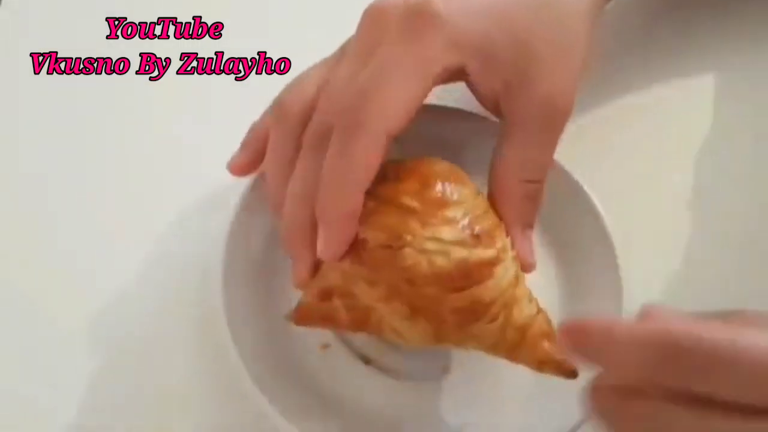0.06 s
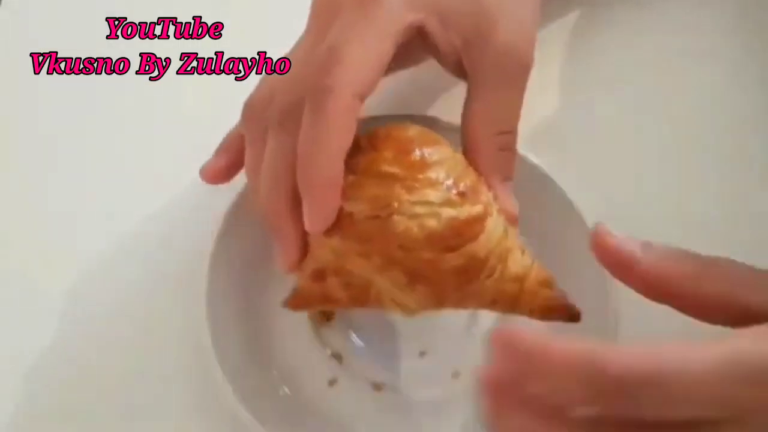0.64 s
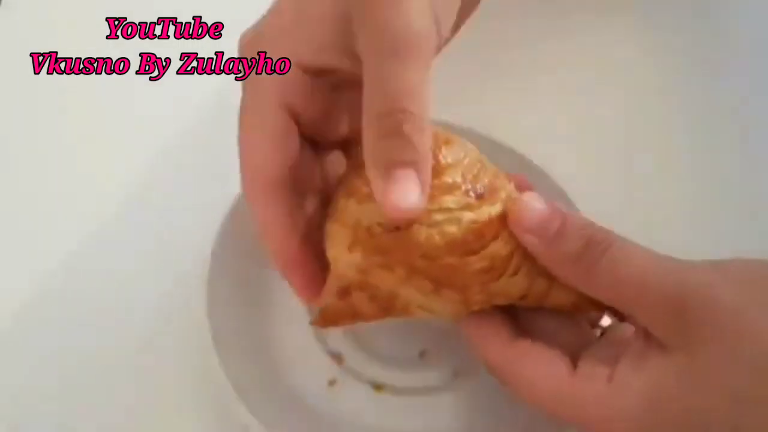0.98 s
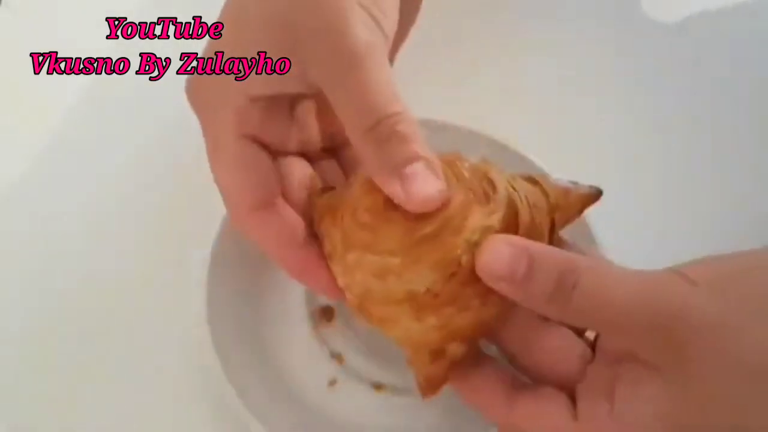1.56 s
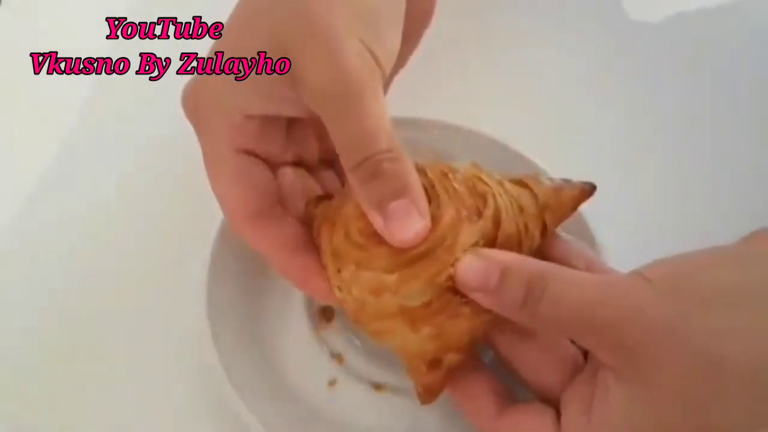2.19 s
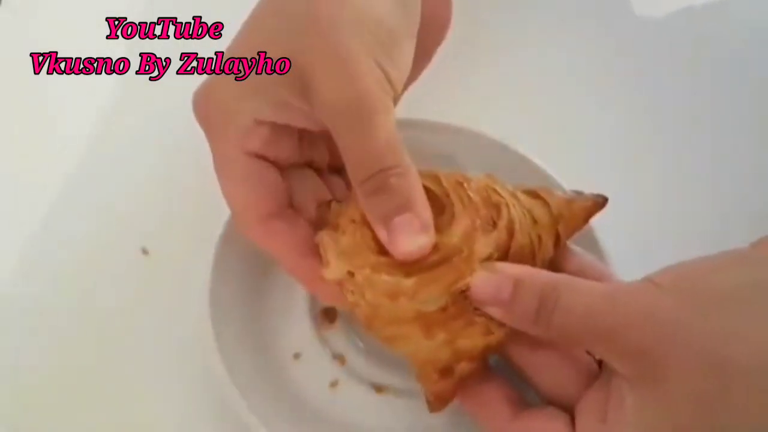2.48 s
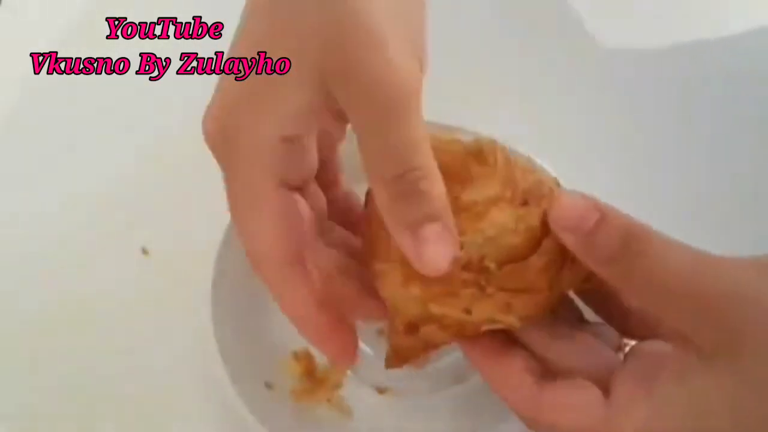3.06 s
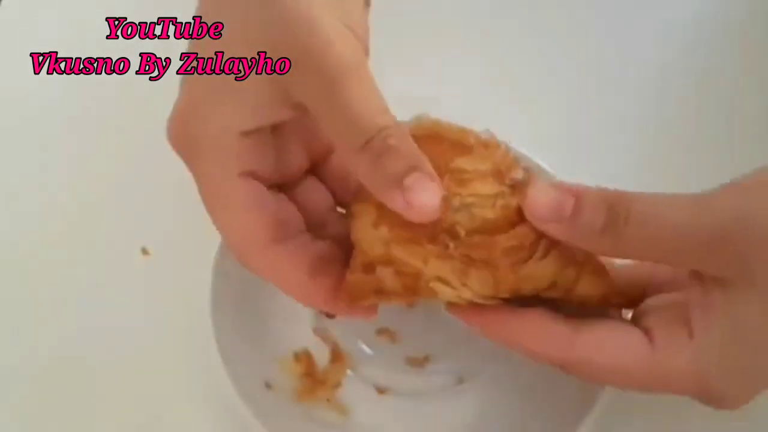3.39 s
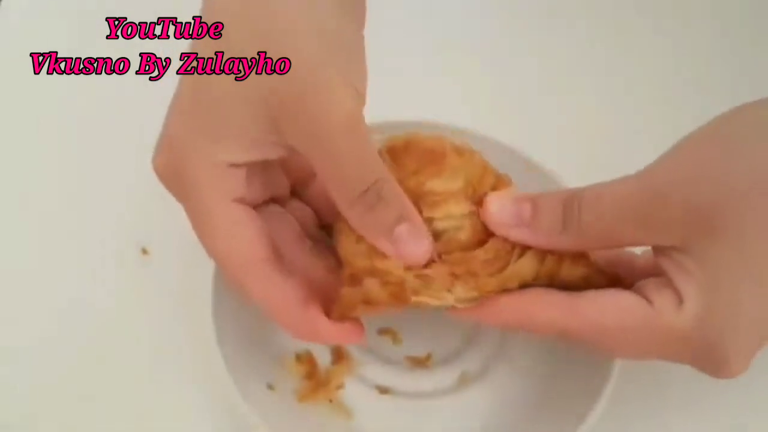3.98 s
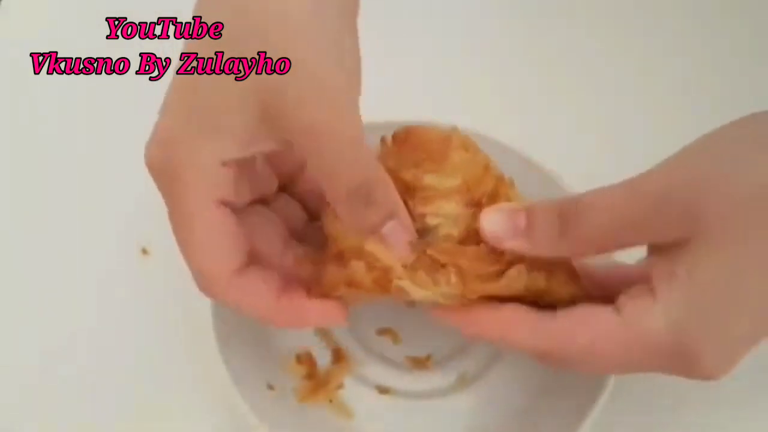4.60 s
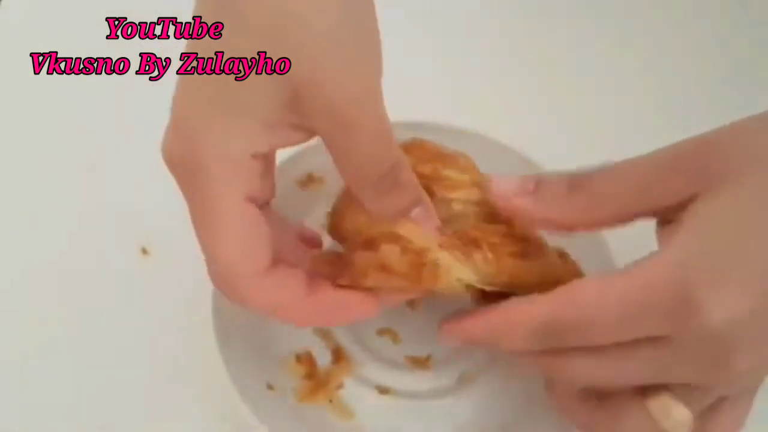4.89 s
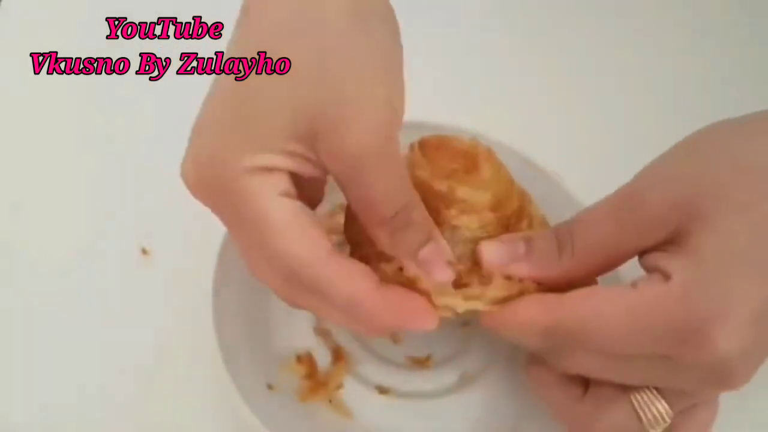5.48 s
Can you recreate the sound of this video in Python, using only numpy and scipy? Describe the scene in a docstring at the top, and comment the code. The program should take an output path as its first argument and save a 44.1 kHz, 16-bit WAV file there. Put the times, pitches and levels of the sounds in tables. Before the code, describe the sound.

A plate scrapes and clinks on a table, then crisp puff pastry is broken apart by hand in three close, crackling bouts.

```python
"""A small quiet room, at a table: a baked puff pastry is lifted from a china plate and torn open by hand.
The plate is nudged over the table top with bumps and scrapes, and clinks as fingers and ring catch it.
Up close, the crust gives way in three bouts: a crackle of tiny flake fractures, with louder snaps of
whole layers on top and the dull tearing of soft dough beneath. Dry skin rubs as the grip changes.
A low room tone and a short tail off the walls sit behind it all."""
import sys
import numpy as np
from scipy import signal
from scipy.fft import rfft, irfft, next_fast_len
from scipy.io import wavfile
from scipy.ndimage import uniform_filter1d, map_coordinates

SR = 44100
rng = np.random.default_rng(int(sys.argv[2]) if len(sys.argv) > 2 else 0)


def to_wav(s):
    """Save 16-bit WAV."""
    ch = np.atleast_2d(s).T  # columns
    pcm = np.round(np.clip(ch, -1, 1) * 32767)  # PCM
    wavfile.write(sys.argv[1], SR, pcm.astype(np.int16))


N = 244314

# stereo image: (frequency [Hz], left-right correlation [0..1])
STEREO_LIKENESS = [(30, 0.4), (150, 0.93), (400, 0.47), (1000, 0.02), (2000, 0.14), (4000, 0.012),
                   (12000, 0.016)]
# colour mismatch of the microphones: (frequency [Hz], left minus right [dB])
MIC_TILT = [(100, 0.5), (350, 2), (750, -4.5), (1250, 1), (2100, -2), (4000, 0.2), (8000, -0.5), (12500, 2)]
# room tone: (frequency [Hz], relative level [dB])
ROOM_TONE_EQ = [(20, -21.5), (70, -10.5), (110, -9), (150, -3), (200, -12), (280, -18), (500, -21.5),
                (1000, -24), (1500, -27), (3000, -29.5), (6000, -34.5), (9000, -38), (15000, -37)]
# tail off the walls: (frequency [Hz], t60 [s])
ROOM_DECAY = [(200, 0.067), (2000, 0.16), (12000, 0.015)]
# resonances of the table top: (frequency [Hz], relative level [dB], t60 [s])
TABLE_MODES = [(164.6, -9.5, 0.21), (237, -0.5, 0.12), (310, 9.5, 0.027), (381, 8, 0.028),
               (453.8, -2.5, 0.11), (560, -31, 0.014), (1038, -11, 0.065), (1870, -24, 0.18)]
# the plate's foot bumps the table: (time [s], peak [dB], favoured pitch [Hz])
BUMPS = [(0.0239, -24.5, 340), (.28, -21.5, 337), (.288, -27.5, 430), (.338, -30, 395), (.345, -26.5, 305),
         (.353, -29.5, 330), (.382, -36, 300), (0.539, -47, 450), (0.645, -40, 400), (0.665, -40, 290),
         (0.679, -42.5, 230), (0.712, -55, 280), (2.005, -43.5, 267), (2.683, -36, 337),
         (2.8544, -28.5, 233), (2.868, -31, 235), (2.879, -33.5, 444), (3.57, -48, 400)]
# the plate slides: (start [s], length [s], level [dB])
SHOVES = [(0, 0.056, -43.5), (.28, 0.054, -43), (.35, 0.061, -49.5), (.455, 0.068, -59), (.515, 0.04, -52),
          (.555, 0.072, -54), (.636, 0.053, -59), (2.64, 0.16, -59), (2.778, 0.051, -47), (2.87, 0.11, -68),
          (2.988, 0.025, -57.5), (3.5, 0.052, -63.5), (3.56, 0.03, -57), (4.655, 0.039, -60)]
# china scraping on wood: (frequency [Hz], relative level [dB])
SCRAPE_EQ = [(40, -30), (120, -28), (230, 0.5), (340, -6.5), (410, 1), (460, 9), (520, -7.5), (620, -8),
             (780, -18.5), (1600, -18), (3000, -29.5), (6000, -48.5), (15000, -51.5)]
# resonances of the plate: (frequency [Hz], relative level [dB], t60 [s])
CHINA_MODES = [(1106, -7.5, 0.019), (1417, -13, 0.034), (1642, -8, 0.043), (1905, -16, 0.23),
               (2045, 4, 0.016), (2120, -11.5, 0.024), (2747, -15, 0.076), (3510, -15, 0.089),
               (3860, 0.5, 0.13), (4279, 6, 0.034), (4368, 2.5, 0.039), (4570, -23, .025),
               (4960, -8, 0.035), (6395, -3.5, 0.071), (7120, -3.5, 0.048), (7400, -10.5, 0.023),
               (9870, -15, 0.08), (10400, -15, 0.032), (14100, -22.5, 0.037)]
# taps on the plate: (time [s], peak [dB], favoured mode [Hz], hardness [treble tilt, higher is brighter],
# low ring of the bowl [dB], finger damping [dB/s], peak of the thud through the table [dB])
TAPS = [(0.394, -41, 1370, -4, -4, 896, -60), (0.399, -38.5, 1380, -6, -5.5, 700, -60),
        (1.051, -17, 4100, 1.5, -1, 220, -32), (1.055, -21.5, 6300, 2.5, -1.5, 350, -47.5),
        (1.066, -32, 6350, 3.5, 4, 400, -41.5), (2.663, -31.5, 3900, 0, -8, 500, -43.5),
        (2.701, -24.5, 4270, 2, 0, 600, -38.5), (2.716, -29.5, 4070, -3, -3, 500, -35.5),
        (2.818, -19.5, 4180, 2, 3.5, 1400, -37), (2.8225, -26.5, 2030, 5.5, 0, 899, -42),
        (2.9078, -11.5, 4280, 4, 4.5, 1500, -33), (2.921, -29, 4250, 9, -11, 900, -46),
        (3.114, -35.5, 6200, 11, 2, 200, -55), (3.214, -39, 3630, 6.5, -4, 30, -61),
        (4.401, -27.5, 4430, 0.5, 0, 902, -46), (4.406, -34, 4350, 0, 7, 900, -49),
        (4.625, -33.5, 3840, 2, 3, 48, -47.5), (4.649, -39, 1580, -5, -3, 502.5, -48.5)]
# contact click of a tap: (frequency [Hz], relative level [dB])
CLICK_EQ = [(200, -3), (500, -6), (2000, -7.5), (4500, -4.5), (7500, -47), (8700, -56), (10000, -36),
            (15000, -32)]
# skin slides over table and crust: (start [s], length [s], level [dB])
RUBS = [(.24, 0.031, -61), (.33, 0.026, -61), (.51, 0.084, -70), (.775, 0.018, -62), (1.3, 0.026, -63),
        (3.41, 0.052, -61.5), (3.47, 0.086, -60)]
# dry skin friction: (frequency [Hz], relative level [dB])
SKIN_EQ = [(150, -10), (500, -5), (760, -3), (960, -1.5), (1200, -8.5), (2000, -7.5), (3000, -9),
           (4500, -16), (8000, -21.5), (15000, -26)]
# fingertips shift on the crust: (start [s], length [s], level [dB])
TOUCHES = [(.96, 0.022, -67), (1.303, 0.042, -61.5), (1.503, 0.0089, -58), (3.368, 0.01, -60),
           (3.727, 0.013, -58), (3.785, .008, -59), (3.81, 0.0097, -58.5)]
# the inner dough gives way: (start [s], length [s], level [dB], pocket pitch [Hz])
PULLS = [(4.01, 0.014, -50, 1000), (4.039, 0.021, -50.5, 850), (4.08, 0.0087, -40, 950),
         (4.097, 0.014, -53, 358), (4.283, 0.019, -53, 900), (4.31, 0.014, -53, 370),
         (4.487, 0.017, -54, 1300)]
# dull tearing of dough: (frequency [Hz], relative level [dB])
DOUGH_EQ = [(120, -46), (380, 4), (580, -7), (850, -5), (1150, -2.5), (1600, -10), (2500, -12), (6000, -17),
            (15000, -41)]
# brittle crust breaking: (frequency [Hz], relative level [dB])
CRUST_EQ = [(120, -10.5), (240, -15.5), (400, -9.5), (700, -17.5), (1150, -4), (1500, -7), (2020, -2.5),
            (2600, -1.5), (4180, 1.5), (7220, 1), (8200, -3), (9000, -15), (10500, -12.5), (12500, -12.5),
            (15000, -13.5)]
# crackle bed under the thumbs' pressure, one envelope per bout: (time [s], level [dB])
SQUEEZES = [
    [(1.62, -67), (1.665, -64), (1.712, -51), (1.8, -55.5), (1.856, -52.5), (2.12, -59.5), (2.147, -70),
     (2.2, -40), (2.245, -43.5), (2.277, -57.5), (2.31, -46), (2.47, -45), (2.55, -51), (2.636, -43),
     (2.78, -52.5), (2.93, -64.5), (3.0, -58.5), (3.06, -91)],
    [(3.7, -77), (3.8, -72), (3.86, -60), (3.925, -60.5), (3.99, -50.5), (4.1, -50), (4.128, -61),
     (4.16, -46), (4.215, -56), (4.27, -46.5), (4.32, -41), (4.358, -60), (4.39, -57.5), (4.43, -49.5),
     (4.526, -46.5), (4.656, -58), (4.73, -70.5)],
    [(4.98, -73), (5.058, -67.5), (5.19, -66.5), (5.29, -66), (5.34, -57), (5.482, -57), (5.54, -51)],
]
# a patch of crust caves in: (start [s], length [s], level [dB], hollow band gain [dB])
CRUNCHES = [(1.771, 0.027, -47.5, 1), (1.868, 0.028, -51.5, 2), (1.962, 0.014, -50, -2),
            (2.042, .012, -47.5, 9), (2.087, 0.015, -44, 1), (2.121, 0.0052, -45, -12),
            (2.195, 0.019, -44, 13), (2.366, 0.062, -39.5, -11), (2.494, 0.011, -42, 8),
            (2.584, 0.046, -48, -15), (2.733, 0.017, -46.5, 4), (3.838, 0.0074, -53, 4),
            (3.852, 0.024, -52.5, 2), (3.999, 0.055, -46, -1.5), (4.07, 0.037, -47.5, 2),
            (4.226, 0.0055, -51.5, -8), (4.288, 0.024, -52, 8), (4.484, 0.026, -40.5, 1),
            (5.338, 0.023, -52.5, -10), (5.405, 0.011, -43, -6), (5.468, 0.027, -48.5, -10)]
# a whole layer snaps: (time [s], level over 2 ms [dB], layer pitch [Hz])
SNAPS = [(1.679, -42, 1900), (1.704, -40.5, 2200), (1.7128, -48, 6180), (1.7671, -31.5, 7160),
         (1.8059, -39.0, 6900), (1.8292, -49, 4770), (1.8623, -38, 7000), (1.916, -39.5, 6410),
         (1.9398, -31.5, 6360), (2.0009, -35.5, 4800), (2.0324, -37, 4440), (2.0567, -38, 2370),
         (2.068, -35.5, 6900), (2.089, -30, 6410), (2.1082, -30.0, 6180), (2.159, -31.5, 7200),
         (2.183, -31.5, 4280), (2.1955, -32.0, 2120), (2.2095, -26.5, 6900), (2.2185, -24.5, 5740),
         (2.2927, -37, 6900), (2.344, -33.0, 6650), (2.3721, -32.5, 6410), (2.4391, -30.5, 5330),
         (2.4667, -34.0, 4280), (2.4842, -33.0, 4280), (2.5023, -22.0, 2030), (2.5536, -33, 3970),
         (2.5757, -30.0, 6410), (2.5789, -30, 4280), (2.6319, -33.5, 5740), (2.7388, -38.5, 1910),
         (3.274, -52, 7160), (3.2983, -50, 4720), (3.7558, -51.5, 5960), (3.8111, -54.0, 3970),
         (3.8646, -42, 3970), (3.906, -50, 8000), (3.9408, -47, 5960), (4.1398, -34.5, 4800),
         (4.1922, -44, 2960), (4.23, -42, 4770), (4.2853, -28, 6700), (4.3723, -44, 5740),
         (4.4583, -33, 5330), (4.4719, -36, 6850), (4.5284, -31.5, 5530), (4.552, -39.0, 5140),
         (4.6062, -42, 4800), (4.6823, -48.0, 4770), (5.021, -48.5, 5740), (5.077, -49, 6410),
         (5.131, -45.5, 4770), (5.202, -50, 7710), (5.2144, -49, 4770), (5.2398, -53, 7430),
         (5.2831, -59, 5530), (5.3081, -45, 3070), (5.38, -40.5, 4950), (5.4057, -43, 5330),
         (5.4568, -41, 4280), (5.4801, -38.0, 6700), (5.5213, -31.5, 7710)]

TOP_HZ = 15150  # band limit
CRACK_RISE_S, CRACK_RUN_S = 0.0005, 0.0011  # attack and decay of a snap


def amp(db):
    """Decibels to gain."""
    return np.exp(np.asarray(db) * (np.log(10) / 20))


def unit(x):
    """Scale to rms 1."""
    return x / np.sqrt(np.mean(x ** 2) + 1e-20)


def to_peak(x, db):
    """Scale to a peak level."""
    return amp(db) * x / np.abs(x).max()


def along(points, hz):
    """Read (frequency, value) points on a log axis."""
    f, v = np.transpose(points)
    return np.interp(np.log(hz + 1), np.log(f + 1), v)


def bell(hz, centre_hz, octaves):
    """An EQ bell of height 1."""
    return np.exp(-(np.log2((hz + 1) / centre_hz) / octaves) ** 2)


def filtered(x, response):
    """Apply a gain curve over frequency."""
    n = x.shape[-1]
    m = next_fast_len(n + 2048)
    return irfft(rfft(x, m) * response(np.fft.rfftfreq(m, 1 / SR)), m)[..., :n]


def spread(pair, eq):
    """Colour two unrelated signals and blend to stereo at rms 1: narrow bass, wide treble."""
    angle = lambda hz: np.arccos(np.clip(along(STEREO_LIKENESS, hz), -1, 1)) / 2
    mid, side = filtered(pair, lambda hz: amp(along(eq, hz)) * [np.cos(angle(hz)), np.sin(angle(hz))])
    return unit(np.array([mid + side, mid - side]))


def wobble(rate_hz, n=N):
    """A smooth random curve of n samples."""
    knots = rng.standard_normal(int(n * rate_hz / SR) + 4)
    return map_coordinates(knots, [np.arange(n) * rate_hz / SR])


def add(track, s, sound):
    """Mix a stereo sound into the track at time s."""
    i = max(round(s * SR), 0)
    track[:, i:i + sound.shape[1]] += sound[:, :max(N - i, 0)]


def burst(t, rise_s, decay_s):
    """A stereo noise transient."""
    return rng.standard_normal((2, len(t))) * (1 - np.exp(-(t / rise_s) ** 2)) * np.exp(-t / decay_s)


def strokes(rows, attack_s, release_s, sag_db_per_s=0):
    """Gain envelope of gestures that rise, hold or sag, and die away."""
    t, gain = np.arange(N) / SR, np.zeros(N)
    for start, length, db in rows:
        first = max(int(start * SR), 0)
        age = np.maximum(t[first:first + SR // 3] - start, 0)
        shape = (1 - np.exp(-age / attack_s)) * np.exp(-np.maximum(age - length, 0) / release_s)
        gain[first:first + len(age)] += amp(db - sag_db_per_s * age) * shape
    return gain


def swarm(eq, per_s, scatter_db, clump_db, decay_s, voices=3):
    """A granular texture: tiny noise grains at random times and sizes, swelling in clumps."""
    t = np.arange(SR // 200) / SR
    pair = np.zeros((2, N))
    for _ in range(voices):
        onsets = (np.cumsum(rng.exponential(size=N // 20)) * SR * voices / per_s).astype(int)
        sizes = amp(scatter_db * np.minimum(rng.standard_normal(len(onsets)), 2))
        impulses = np.bincount(onsets[onsets < N], sizes[onsets < N], N)
        pair += signal.oaconvolve(impulses[None], burst(t, decay_s / 2, decay_s), axes=1)[:, :N]
    return spread(pair * amp(clump_db * np.tanh(wobble(120))), eq)


def ring(modes, t, apart_rad, scatter_db, detune):
    """Decaying modes, shifted by grip and place on each blow; high ones reach the two sides out of step."""
    hz, db, t60 = np.transpose(modes)[..., None]
    strength, phase, shift = rng.standard_normal((3, len(modes), 1))
    lead = np.minimum(hz / 4000, 1) * (2 * phase + apart_rad / 2 * np.array([1, -1])[:, None, None])
    cycles = hz * (1 + detune * shift) * t
    envelopes = amp(db + scatter_db * strength - 60 * t / t60)
    return np.sum(envelopes * np.sin(2 * np.pi * cycles + lead), axis=1)


def room_tone():
    """A faint, steady bed of low rumble."""
    return amp(-64) * spread(rng.standard_normal((2, N)), ROOM_TONE_EQ)


def room_tail(send):
    """Nearby walls answer with a short diffuse tail."""
    noise = spread(rng.standard_normal((2, SR // 3)), [(200, 0), (12000, 0.014)])
    hz, t, bands = signal.stft(noise, SR, nperseg=256)
    tail = signal.istft(bands * amp(-60 * t / along(ROOM_DECAY, hz)[:, None]), SR, nperseg=256)[1]
    tail = np.pad(tail / np.linalg.norm(tail[0]), ((0, 0), (SR // 200, 0)))  # 5 ms pre-delay
    return signal.fftconvolve(send, tail, axes=1)[:, :N]


def table_top():
    """The plate's foot bumps, sticks and slips on the wood; taps knock through it more brightly."""
    out, t = np.zeros((2, N)), np.arange(SR // 7) / SR
    bumps = [(s, db, hz, 6.5) for s, db, hz in BUMPS]
    knocks = [(s, thud_db, 400, 9) for s, *_, thud_db in TAPS]
    for s, db, pitch_hz, boost_db in bumps + knocks:
        thud = ring(TABLE_MODES, t, apart_rad=0.25, scatter_db=2, detune=0.043)
        thud *= 1 - np.exp(-t / 0.00097)
        grit = amp(-21) * spread(burst(t, 0.00023, 0.0084), SCRAPE_EQ)
        blow = filtered(thud + grit, lambda hz: amp(boost_db * bell(hz, pitch_hz, 0.4)))
        add(out, s, to_peak(blow, db))
    scrape = unit(spread(rng.standard_normal((2, N)), SCRAPE_EQ) * amp(2.83 * wobble(70)))
    sliding = strokes(SHOVES, attack_s=0.0017, release_s=0.025, sag_db_per_s=39)  # friction slows it
    low_cut = signal.butter(3, 135, 'high', fs=SR, output='sos')  # the knocks carry little deep bass
    return signal.sosfilt(low_cut, out + sliding * scrape)


def plate_clinks():
    """Taps ring the finger-damped china; the spot struck favours some modes, hardness the high ones."""
    out, t = np.zeros((2, N)), np.arange(SR // 6) / SR
    attack = 1 - np.exp(-(t / 0.0014) ** 2)
    for s, db, mode_hz, hardness, bowl_db, damping_db_per_s, _ in TAPS:
        modes = ring(CHINA_MODES, t, apart_rad=-2, scatter_db=1.2, detune=0.0067)
        chatter = amp(5 * np.tanh(wobble(450, len(t))))  # the plate rattles on its foot
        tone = modes * amp(-damping_db_per_s * t) * chatter * attack
        click = amp(-23) * spread(burst(t, 0.00042, 0.0055), CLICK_EQ)
        tilt = [(2600, 6.5 - 1.14 * hardness), (3500, 0.0007), (4800, 0),
                (6000, 0.61 * hardness), (11000, 2.1 * hardness)]
        eq = lambda hz: amp(along(tilt, hz) + 11 * bell(hz, mode_hz, 0.11)
                            + bowl_db * bell(hz, 2000, 0.25))
        add(out, s, to_peak(filtered(tone + click, eq), db))
    low_cut = signal.butter(2, 250, 'high', fs=SR, output='sos')  # the clinks carry no deep bass
    return signal.sosfilt(low_cut, out)


def skin_rubs():
    """Dry skin slides in countless soft slips as the hands change their grip."""
    slips = swarm(SKIN_EQ, per_s=2800, scatter_db=-0.5, clump_db=1, decay_s=0.0013)
    return strokes(RUBS, attack_s=0.0061, release_s=0.022) * slips


def dough_tears():
    """The soft inside tears dully; each pull opens a pocket with its own pitch."""
    fibres = swarm(DOUGH_EQ, per_s=900, scatter_db=3, clump_db=2, decay_s=0.00095)
    out = np.zeros((2, N))
    for s, length, db, pitch_hz in PULLS:
        pocket = unit(filtered(fibres, lambda hz: amp(13 * bell(hz, pitch_hz, 0.7))))
        out += strokes([(s, length, db)], attack_s=0.0035, release_s=0.0043) * pocket
    return out


def crust_chips(per_s=220, centre_hz=4610, spread_octaves=0.655, decay_cycles=4):
    """Stiff chips break off, each pinging for a few cycles at its own pitch."""
    out, t = np.zeros((2, N)), np.arange(SR // 70) / SR
    count = int(per_s * N / SR)
    times = rng.uniform(0, N / SR, count)
    traits = np.clip(rng.standard_normal((count, 4)), -2, 2)
    for s, (pitch, size, left, right) in zip(times, traits):
        cycles = centre_hz * 2 ** (spread_octaves * pitch) * t
        phase = np.pi * np.array([[left], [right]])
        envelope = amp(1.7 * size) * (np.exp(-cycles / decay_cycles) - np.exp(-cycles))
        add(out, s, envelope * np.sin(2 * np.pi * cycles + phase))
    return unit(out)


def crust_hollows(pair, depth_db):
    """Every patch of crust has its own hollows, so the colour keeps shifting."""
    bands = signal.stft(pair, nperseg=256)[2]
    colour = uniform_filter1d(rng.standard_normal(bands.shape[1:]), size=5, axis=0)
    colour = uniform_filter1d(colour, size=9, axis=1)
    return signal.istft(bands * amp(depth_db * unit(colour)), nperseg=256)[1][:, :N]


def breaking(crunches):
    """Envelope of the crackle: steady pressure, patches caving in, crumbs in the wake of each snap."""
    t = np.arange(N) / SR
    steady = sum(amp(np.interp(t, *np.transpose(bout), left=-120, right=-120)) for bout in SQUEEZES)
    caving = strokes(crunches, attack_s=0.00067, release_s=0.011)
    crumbs = strokes([(s, 0, db - 12.5) for s, db, _ in SNAPS], attack_s=CRACK_RUN_S, release_s=0.0086)
    return np.sqrt(steady ** 2 + caving ** 2 + crumbs ** 2)


def crust_crackle(firm_db=-50, crossover_hz=8700, hollow_hz=1780):
    """Pressure crushes the crust: thick flakes crackle over hollow pockets, a dust of thin ones fizzes."""
    flakes = swarm(CRUST_EQ, per_s=2200, scatter_db=-1, clump_db=2, decay_s=0.00047)
    flakes = crust_hollows(flakes, depth_db=3.5)
    stray_snaps = swarm(CRUST_EQ, per_s=110, scatter_db=0.5, clump_db=0, decay_s=0.00093)
    flakes = flakes + amp(-9.5) * stray_snaps + amp(-7) * crust_chips()
    dust = swarm(CRUST_EQ, per_s=3400, scatter_db=-0.5, clump_db=2.5, decay_s=0.00079)
    lows = lambda hz: 1 / (1 + (hz / crossover_hz) ** 10)
    thick = unit(filtered(flakes, lows))
    thin = unit(filtered(flakes + amp(0.5) * dust, lambda hz: 1 - lows(hz)))
    pockets = filtered(thick, lambda hz: bell(hz, hollow_hz, 0.51))
    avalanches = amp(1.3 * wobble(330) - firm_db)  # scaled so that a firm squeeze has force near 1
    force = avalanches * breaking([(s, length, db) for s, length, db, _ in CRUNCHES])
    hollow_force = avalanches * breaking([(s, length, db + lift) for s, length, db, lift in CRUNCHES])
    crackle = amp(firm_db - 0.5) * (force * (thick - pockets) + hollow_force * pockets)
    fizz = amp(firm_db + 0.5) * force ** 1.09 * thin  # a harder squeeze is brighter
    fingertips = strokes(TOUCHES, attack_s=0.0097, release_s=0.0044) * (thick + amp(-5) * thin)
    return crackle + fizz + fingertips


def layer_snaps(lead_in_s=0.0023, splinter_s=0.0059, typical_db=-29):
    """A crack shoots through a whole layer in about a millisecond and sheds splinters."""
    out, t = np.zeros((2, N)), np.arange(-SR // 125, SR // 50) / SR
    run = np.exp(-np.abs(t) / np.where(t < 0, CRACK_RISE_S, CRACK_RUN_S))
    # a faint noise swells just before each snap; the splinters trail after it
    skirt = amp(-13) * np.exp(-np.abs(t) / np.where(t < 0, lead_in_s, splinter_s))
    level_trim = np.sqrt(0.002 / np.ptp(t))  # levels count the energy as if packed into 2 ms
    for s, db, pitch_hz in SNAPS:
        crack = spread(rng.standard_normal((2, len(t))) * (run + skirt), CRUST_EQ)
        thickness_db = db - typical_db  # thicker layers are louder, duller and fuller
        edge_db = 10 - 0.2 * thickness_db
        body_db = 0.86 * max(thickness_db, 0)
        eq = lambda hz: (hz < TOP_HZ) * amp(7 * bell(hz, pitch_hz, 0.29) + body_db * bell(hz, 1950, 0.91)
                                            + edge_db * np.clip((hz - 7500) / 2500, 0, 1))
        add(out, s + 2 * CRACK_RISE_S + t[0], amp(db) * level_trim * unit(filtered(crack, eq)))
    return out


def scene():
    """Pastry and hands up front with plate and table, over room tone and a light reverb."""
    pastry = crust_crackle() + dough_tears() + layer_snaps() + skin_rubs()
    china, wood = plate_clinks(), table_top()
    reverb_send = amp(-14.5) * pastry + amp(-18) * china + amp(-16) * wood
    return pastry + china + wood + room_tone() + room_tail(reverb_send)


def record(dry):
    """Two microphones of slightly different colour, then a steep high cut."""
    pair = filtered(dry, lambda hz: amp(along(MIC_TILT, hz) * np.array([[.5], [-.5]])))
    return filtered(pair, lambda hz: 1 / np.sqrt(1 + (hz / TOP_HZ) ** 160))


dry = scene()
out = record(dry)
to_wav(out)
```